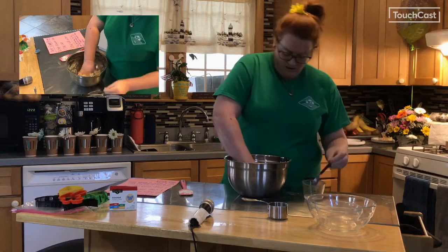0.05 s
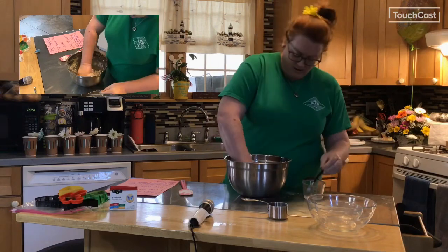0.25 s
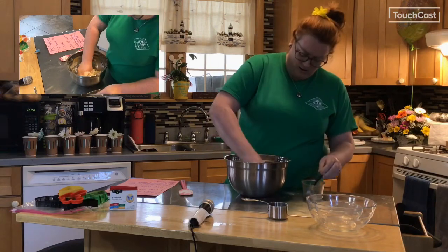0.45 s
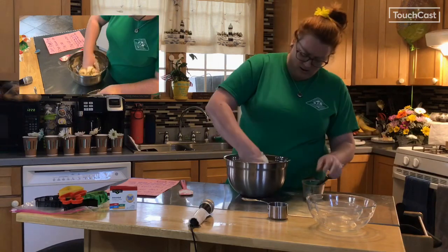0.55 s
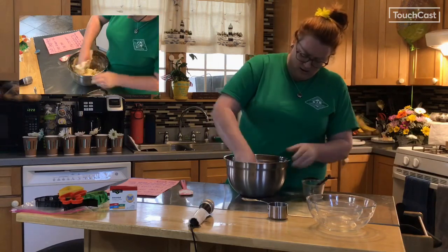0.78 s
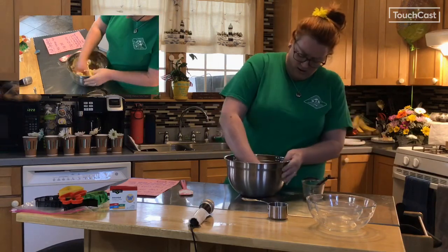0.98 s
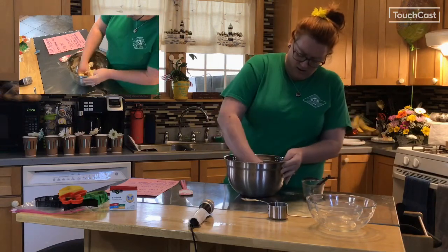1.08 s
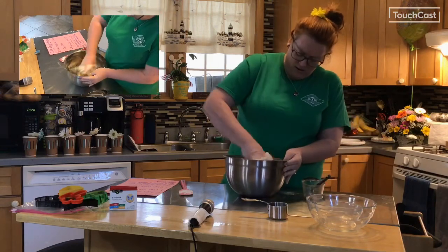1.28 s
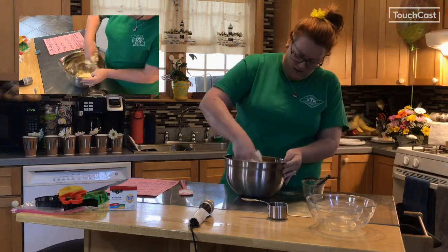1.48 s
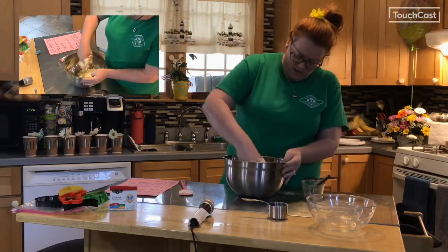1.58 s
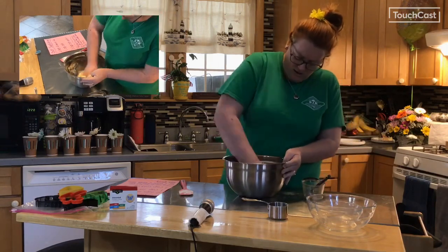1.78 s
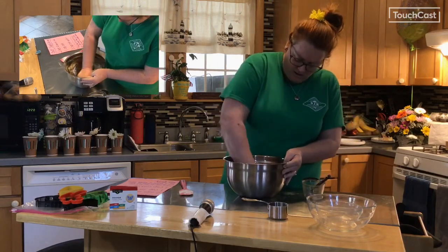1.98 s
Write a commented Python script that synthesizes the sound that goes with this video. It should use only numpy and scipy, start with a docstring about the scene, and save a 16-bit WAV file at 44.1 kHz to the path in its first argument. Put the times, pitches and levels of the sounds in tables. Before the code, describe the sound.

A hand scrapes floury dough in a metal bowl, with finger taps and an opening bump.

```python
"""Dough in a steel bowl

A hard object is bumped on a kitchen counter and rocks to rest; the counter top booms under it.
A hand rubs floury dough round a steel bowl, faintly at first, then in firmer strokes, while
fingers knock against the wall and grip the rim. One sweep up the wall rises in pitch.
The hands damp the bowl; the room is small and quiet."""
import sys
import numpy as np
from scipy import signal
from scipy.fft import rfft, irfft
from scipy.io import wavfile

SR = 44100
rng = np.random.default_rng(int(sys.argv[2]) if len(sys.argv) > 2 else 0)


def digitize_waveform(pressure):
    """Quantize a signal to 16-bit integers and store it at the path in sys.argv[1].

    Rows of a 2-D input are taken as channels; values are limited to [-1, 1].
    """
    field = np.atleast_2d(pressure).T
    bounded = np.clip(field, -1, 1)
    quanta = np.round(bounded * 32767).astype(np.int16)
    wavfile.write(sys.argv[1], SR, quanta)


N = 90404
T = np.arange(SR // 2) / SR  # time within one event [s]


def amp(db):
    """Decibels to amplitude ratio."""
    return 10 ** (np.asarray(db) / 20)


def unit_rms(x):
    """Normalisation to an rms of 1."""
    return x / np.sqrt(np.mean(x ** 2) + 1e-20)


def value_at(points, hz):
    """Interpolation on a log-frequency axis."""
    f, value = np.transpose(points)
    return np.interp(np.log(hz + 1), np.log(f + 1), value)


def add(mix, start_s, sound):
    """Superposition: a sound joins the mix at its start time."""
    part = mix[max(round(start_s * SR), 0):][:len(sound)]
    part += sound[:len(part)]


def decay(t, t60):
    """Exponential damping: 60 dB down after t60 seconds."""
    return np.exp(-np.log(1000) * t / t60)


def colour(x, gain_db):
    """Spectral shaping by a function of frequency, scaled to an rms of 1."""
    hz = np.fft.rfftfreq(len(x), 1 / SR)
    return unit_rms(irfft(rfft(x) * amp(gain_db(hz)), len(x)))


def lowpass(x, hz):
    """Second-order roll-off above a cutoff."""
    return signal.lfilter(*signal.butter(2, min(hz, SR / 2 - 1000), fs=SR), x)


def ring(modes):
    """Free vibration: a sum of damped sinusoids of alternating sign."""
    return sum((-1) ** k * amp(db) * decay(T, t60) * np.sin(2 * np.pi * hz * T)
               for k, (hz, db, t60) in enumerate(modes))


def flutter(samples, depth_db):
    """Random amplitude modulation: the gain of uneven slipping."""
    return amp(depth_db * unit_rms(lowpass(rng.standard_normal(samples), hz=68)))


# spectrum of the quiet kitchen (frequency [Hz], relative level [dB])
AIR_SPECTRUM = [(20, -9), (50, 10.5), (130, -5), (350, 4), (600, -4), (1500, -7.5), (4000, -20),
                (6700, -17), (10000, -24), (16000, -24)]


def air(level_db=-54):
    """Ambient noise: steady, broadband and strongest in the bass."""
    return amp(level_db) * colour(rng.standard_normal(N), lambda f: value_at(AIR_SPECTRUM, f))


# spectrum of dough rubbing on steel (frequency [Hz], relative level [dB])
FRICTION_SPECTRUM = [(40, -4), (180, -1), (400, 6), (700, 0.5), (1250, 0.5), (2500, -3.5), (5000, -3.5),
                     (8200, -2), (9300, -11), (11000, -9), (16000, -10.5)]
# resonances of the hollow, hand deep inside, with some dips in the sound (frequency [Hz], bandwidth [Hz], gain
# [dB])
DEEP_RESONANCES = [(190, 31, 10), (910, 80, 2.5), (1300, 390, -2), (1880, 83, 9), (2055, 130, 12),
                   (2290, 110, -4), (2600, 290, 11.5), (2950, 170, -3.5), (3410, 130, 13),
                   (3700, 260, -0.5), (4010, 160, 5.5), (4500, 180, 11.5), (4800, 110, -3), (5030, 80, 2),
                   (5760, 150, -3.5), (6700, 200, 5), (7000, 195, 0.5), (8150, 250, 3)]
# resonances of the hollow, hand near the rim (frequency [Hz], bandwidth [Hz], gain [dB])
RIM_RESONANCES = [(330, 104, 12.5), (926, 230, 15.5), (1500, 270, 12.5), (2500, 160, 9), (2830, 160, 10.5),
                  (4150, 390, 1), (5150, 320, 5), (5870, 200, 11), (6610, 410, 8), (10200, 330, 9.5)]
# strokes of the hand (time [s], duration [s], level [dB], treble shelf [dB], bass shelf [dB],
# nearness to the rim [0-1], grain spread [dB])
STROKES = [(0, 0.078, -51.5, -2, -3, 0.3, 5.5), (.05, 0.2, -47.5, -7.5, 1, 0.5, 5.5),
           (.28, 0.22, -44.5, -4.5, 4, 0.35, 4.5), (.55, 0.14, -58.5, 1, -2, 0.7, 3),
           (0.719, 0.096, -39, 8.5, 19.5, .5, 3.5), (0.772, .135, -35.5, 8.5, 6, 0, -2),
           (0.886, 0.23, -35, 1, -9, 0.14, 2), (1.087, 0.2, -37, 7, -0.5, 0.7, 3),
           (1.257, 0.14, -45, 9.5, 12, 0.32, 1), (1.342, 0.12, -45.5, -1, 7.5, 0.7, 4.5),
           (1.521, 0.099, -53, 6.5, 7, 0.9, 12), (1.579, 0.11, -40.5, 6, 7, 0.43, 4.5),
           (1.633, 0.25, -48, 10.5, 7.5, 0.66, 2), (1.808, 0.071, -44, -10, 0, 0.68, 2.5),
           (1.864, .13, -43, -1.5, 3, 0.6, 0.5), (1.97, 0.28, -48, 2.5, 9.5, 0.3, 5)]


def rubbing(grains_per_s=3000, hiss_db=1):
    """Stick-slip friction: crumbs slip on steel, filtered by a cavity that the hand retunes."""
    out = np.zeros(N)
    for start_s, length_s, db, treble_db, bass_db, rim, spread_db in STROKES:
        slipping = rng.random(len(T)) < grains_per_s / SR
        strengths = amp(spread_db * np.minimum(rng.exponential(1, len(T)), 4))
        grains = unit_rms(slipping * strengths * rng.choice([-1, 1], len(T)))
        hiss = amp(hiss_db) * rng.standard_normal(len(T))
        friction = (grains + hiss) * flutter(len(T), depth_db=0.88)

        def stroke_spectrum(f):
            """Lorentzian resonances and two shelves shape the friction spectrum, in dB."""
            deep_db, rim_db = (sum(gain / (1 + (2 * (f - hz) / width) ** 2) for hz, width, gain in peaks)
                               for peaks in (DEEP_RESONANCES, RIM_RESONANCES))
            cavity = deep_db + rim * (rim_db - deep_db)
            treble = treble_db * f ** 2 / (f ** 2 + 5000 ** 2)
            bass = bass_db / (1 + (f / 900) ** 2)
            return value_at(FRICTION_SPECTRUM, f) + cavity + treble + bass

        progress = np.minimum(T / length_s, 1)
        speed = abs(np.sin(np.pi * progress ** 0.67)) ** 0.86  # a rounded arch that peaks early
        add(out, start_s, amp(db) * speed * colour(friction, stroke_spectrum))
    return out


# spectrum of the crack of contact (frequency [Hz], relative level [dB])
CRACK_SPECTRUM = [(100, -7), (550, -8.5), (1150, 6.5), (1450, -5), (1900, 0), (3200, -7), (4100, -4.5),
                  (6000, -9), (7500, -16.5), (11000, -16.5), (16000, -28)]
# modes of the object's body (frequency [Hz], relative level [dB], T60 [s])
BODY_MODES = [(764, -7, 0.08), (900, -4, 0.078), (1030, -21, .11), (1156, 5.5, 0.12), (1239, 0, 0.053),
              (1700, -0.5, 0.15), (1780, -10, 0.082), (2078, -22, 0.1), (2340, -13, 0.15),
              (2474, -9, 0.095), (2683, 5.5, 0.061), (2850, -0.5, 0.076), (3305, -31, .08),
              (4030, 5, 0.096), (3570, -18, 0.15), (4420, -3, .1), (5292, -2, 0.11), (6300, -21, 0.19),
              (6500, -6, 0.16)]
# modes of its edge (frequency [Hz], relative level [dB], T60 [s])
EDGE_MODES = [(1228, -2, .06), (2410, 5.5, 0.044), (2620, -6.5, 0.051), (3890, -9, .04), (4150, 3, 0.024),
              (5900, -27, 0.13)]
# landings on the counter (time [s], gain [dB], cutoff [Hz], thud level [dB], clink gain [dB])
LANDINGS = [(.237, -0.5, 7200, -25, -23.5), (0.2392, -15.5, 5900, -50, -37), (0.2492, -7.5, 2630, -28, -36),
            (0.2564, -3.5, 3760, -32, -24.5), (0.2618, -20, 1800, -34.5, -40),
            (.4333, -9, 1170, -27.5, -44), (0.4432, -18, 1270, -40, -47), (0.4527, -14.5, 2660, -31.5, -59),
            (0.4936, -15.5, 4500, -36, -32)]


def rocking_object(thud_hz=128, thud_t60_s=0.066):
    """Impact excitation: each landing cracks, thuds and rings; a softer contact loses the treble."""
    out = np.zeros(N)
    envelope = decay(T, t60=0.026)
    for start_s, db, cutoff_hz, thud_db, clink_db in LANDINGS:
        noise = colour(rng.standard_normal(len(T)), lambda f: value_at(CRACK_SPECTRUM, f))
        crack = unit_rms(noise * envelope) * np.sqrt(np.mean(envelope ** 2))
        impact = lowpass(amp(-3.5) * crack + amp(-26) * ring(BODY_MODES), cutoff_hz)
        thud = ring([(thud_hz, thud_db, thud_t60_s)])
        add(out, start_s, amp(db) * impact + thud + amp(clink_db) * ring(EDGE_MODES))
    return out


# side modes of the counter top (frequency ratio to the main mode [1], relative level [dB])
COUNTER_SIDE_MODES = [(.885, -29), (1.491, -20.5)]
# booms under the heavy landings (time [s], level [dB], main frequency [Hz])
BOOMS = [(.249, -9, 350.3), (.449, -15.5, 363.9), (.455, -26, 307), (.513, -24, 349.7)]


def counter_booms(rise_s=0.0067, t60_s=0.21):
    """Plate resonance: the counter top swells into a low note after a heavy landing."""
    out = np.zeros(N)
    swell = 1 - np.exp(-T / rise_s)
    for start_s, db, hz in BOOMS:
        sides = [(hz * ratio, db + side_db, t60_s) for ratio, side_db in COUNTER_SIDE_MODES]
        add(out, start_s, swell * ring([(hz, db, t60_s)] + sides))
    return out


# low modes of the steel wall (frequency [Hz], relative level [dB], T60 [s])
WALL_MODES = [(309, -7, 0.29), (351.3, 2, 0.11), (524.7, 1.5, 0.27), (857, -29, 0.17), (1615, -17, 0.11),
              (1884, -25, 0.22), (2520, -43, 0.16), (3420, -43, .25)]
# its high, short-lived modes (frequency [Hz], relative level [dB], T60 [s])
TING_MODES = [(5130, -11, 0.0063), (6360, -5.5, 0.012), (6680, -6.5, 0.027), (6930, -8, 0.019),
              (8180, -18, 0.021)]
# touches on the bowl (time [s], click level [dB], click cutoff [Hz], thud level [dB],
# thud frequency [Hz], ting gain [dB], ring gain [dB])
TAPS = [(0.7107, -26, 1400, -32, 300, -75, -70), (.715, -27.5, 3460, -19, 312, -22, -54),
        (0.7228, -28.5, 4500, -17.5, 345, -19, -52), (0.7812, -46, 2470, -33, 190, -25, -63),
        (.925, -32, 900, -38.5, 53.6, -52, -51), (.922, -48, 1500, -27, 870, -55, -61),
        (.931, -35, 1500, -23.5, 870, -55, -58), (1.2211, -33, 1500, -27, 139, -50, -66),
        (1.2402, -22.5, 1550, -38, 160, -45, -60), (1.2474, -19.5, 900, -16, 540, -32, -39),
        (1.256, -44, 800, -32.5, 48.6, -55, -52), (1.571, -49, 3000, -54, 400, -34, -50),
        (1.574, -31, 900, -21, 805, -53, -70), (1.5775, -42, 900, -25, 694, -31.5, -47),
        (1.614, -14, 3200, -24, 300, -28, -53), (1.6212, -17, 2220, -13.5, 206, -31.5, -30.5),
        (1.627, -20, 800, -26.5, 57.4, -40, -55), (1.641, -39, 900, -20.5, 324, -33, -26.5),
        (1.6998, -14.5, 9500, -27, 404, -22.5, -60), (1.718, -30, 3000, -40, 327, -36, -42.5),
        (1.816, -26, 1800, -40, 403, -57, -46.5), (1.8205, -23.5, 1900, -65, 400, -54, -45),
        (1.977, -32.5, 3000, -34, 170, -60, -49), (2.0382, -23.5, 1680, -28.5, 195, -58, -43.5)]


def finger_taps(thud_decay_cycles=1.14):
    """Damped modal vibration: a finger clicks and thuds, and the held steel rings briefly."""
    out = np.zeros(N)
    for start_s, click_db, cutoff_hz, thud_db, thud_hz, ting_db, ring_db in TAPS:
        snap = lowpass(signal.unit_impulse(len(T)), cutoff_hz)
        rattle = unit_rms(lowpass(rng.standard_normal(len(T)), cutoff_hz)) * decay(T, t60=0.02)
        click = amp(-8) * rattle - snap / snap.max()
        thud = np.sin(2 * np.pi * thud_hz * T) * np.exp(-thud_hz * T / thud_decay_cycles)
        steel = amp(ting_db) * ring(TING_MODES) + amp(ring_db) * ring(WALL_MODES)
        add(out, start_s, amp(click_db) * click + amp(thud_db) * thud + steel)
    return out


# path of the gritty swish up the wall (time [s], centre frequency [Hz], level [dB])
SWEEP_PATH = [(1.09, 2723, -54), (1.11, 3000, -43), (1.135, 4166, -53), (1.16, 5250, -40.5),
              (1.185, 6410, -46), (1.219, 7000, -65)]


def wall_sweep(bandwidth_hz=950):
    """Swept resonance: uneven slips excite a band that climbs as the gap under the fingers closes."""
    times, centre_hz, db = np.transpose(SWEEP_PATH)
    t = np.arange(N) / SR
    carrier = np.exp(2j * np.pi * np.cumsum(np.interp(t, times, centre_hz)) / SR)
    baseband = lowpass(rng.standard_normal(N) + 1j * rng.standard_normal(N), bandwidth_hz / 2)
    swish = (baseband * carrier).real * flutter(N, depth_db=2.5)
    return unit_rms(swish) * np.interp(t, times, amp(db), left=0, right=0)


# reverberation time of the kitchen (frequency [Hz], T60 [s])
ROOM_T60 = [(100, 0.41), (500, 0.3), (2500, 0.35), (6000, 0.26), (15000, 0.14)]


def reverberation(x, delay_s=0.0059):
    """Diffuse field: reflections merge into a noise tail, each band dying at its own rate."""
    hz, t, bands = signal.stft(rng.standard_normal(len(T)), SR, nperseg=256)
    bands *= decay(t, value_at(ROOM_T60, hz)[:, None])
    tail = signal.istft(bands, SR, nperseg=256)[1][:len(T)] * (T > delay_s)
    return signal.fftconvolve(x, tail / np.linalg.norm(tail))[:N]


def scene():
    """Superposition: direct sound, reverberation and ambient noise sum in one channel."""
    knocks = rocking_object()
    bowl = finger_taps() + rubbing() + wall_sweep()
    ambience = air()
    room = reverberation(amp(-15) * knocks + amp(-12.5) * bowl)
    return (knocks + counter_booms() + bowl + room + ambience)[None]


def record(dry):
    """Soft saturation rounds the peaks at full scale; a low-pass filter limits the band."""
    rounded = dry / (1 + dry ** 8) ** (1 / 8)
    band_limit = signal.firwin(511, cutoff=16050, window=("kaiser", 9), fs=SR)
    return signal.oaconvolve(rounded, band_limit[None], "same")


dry = scene()
out = record(dry)
digitize_waveform(out)
```